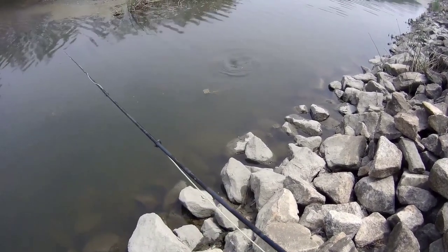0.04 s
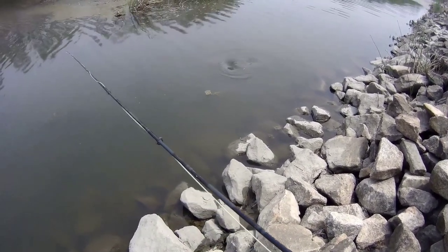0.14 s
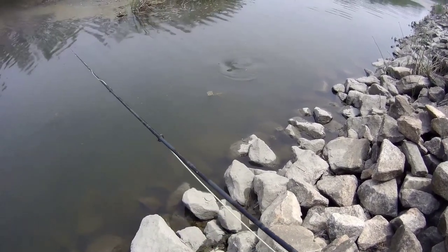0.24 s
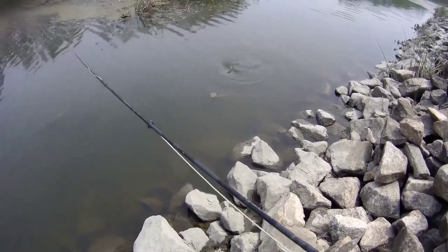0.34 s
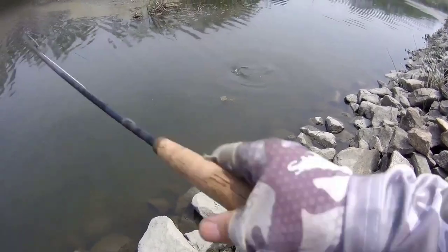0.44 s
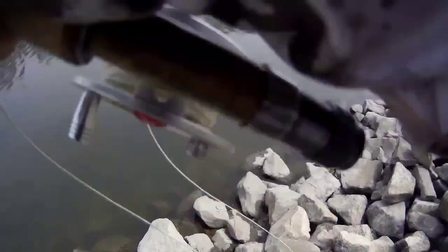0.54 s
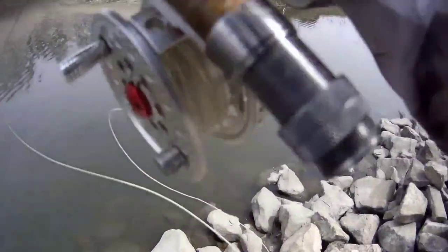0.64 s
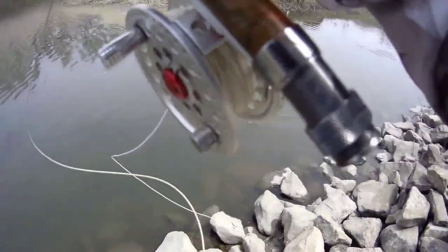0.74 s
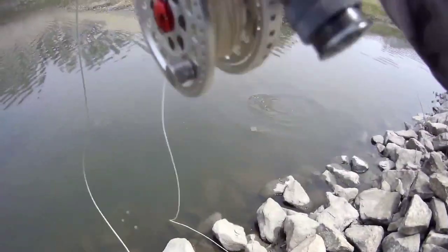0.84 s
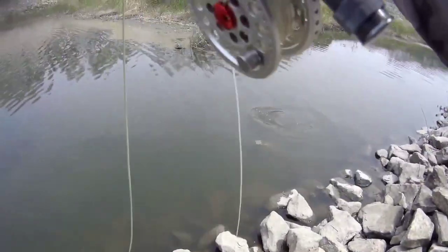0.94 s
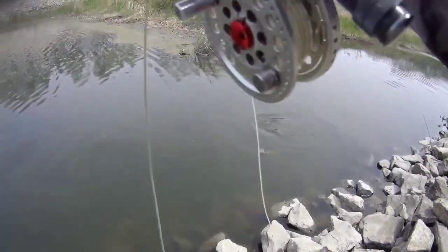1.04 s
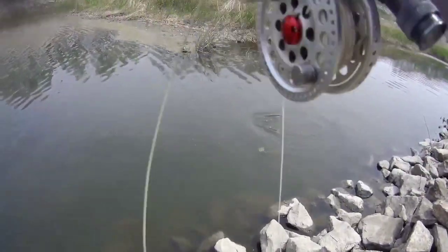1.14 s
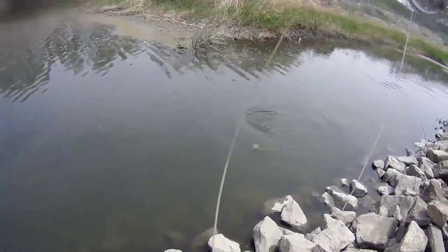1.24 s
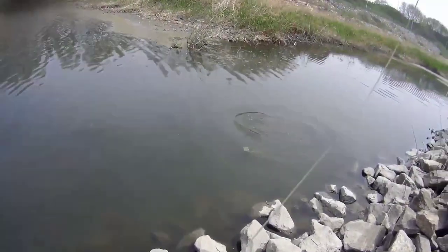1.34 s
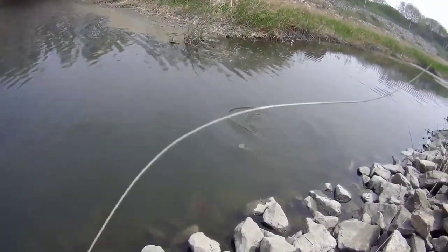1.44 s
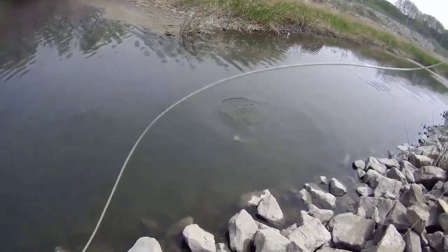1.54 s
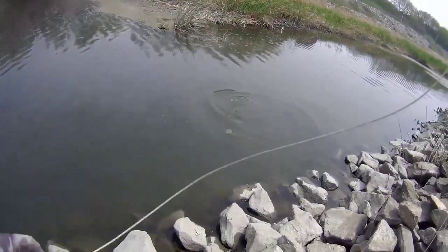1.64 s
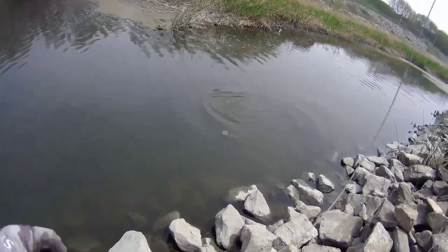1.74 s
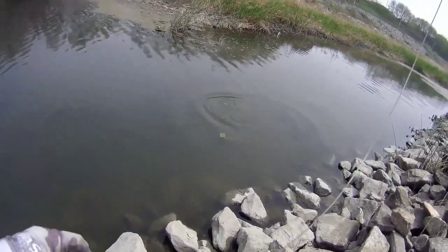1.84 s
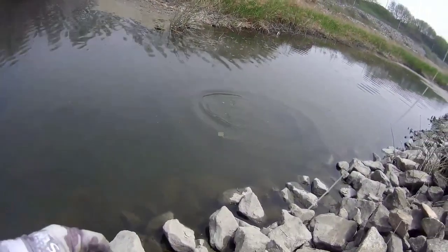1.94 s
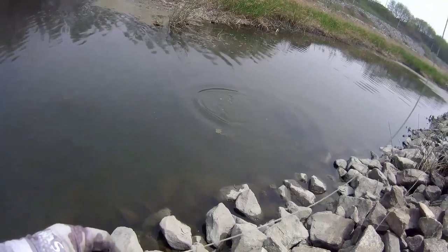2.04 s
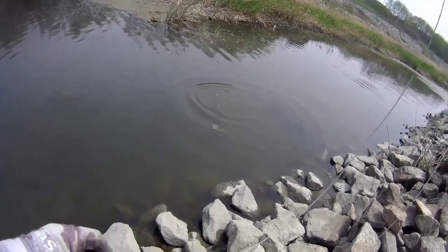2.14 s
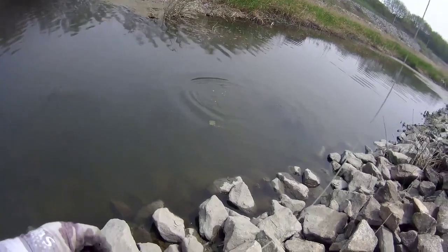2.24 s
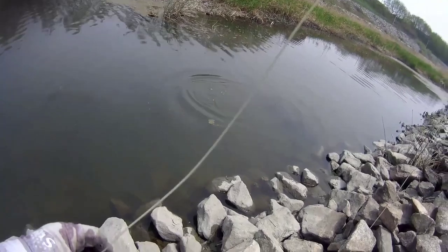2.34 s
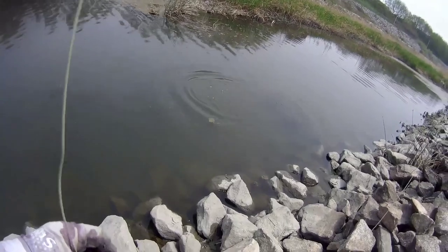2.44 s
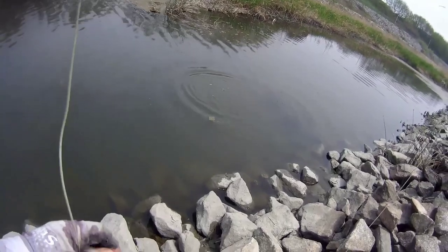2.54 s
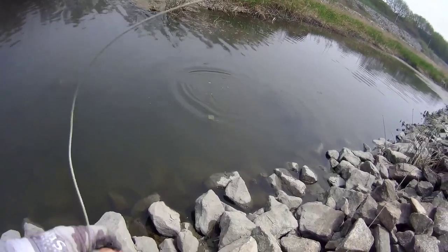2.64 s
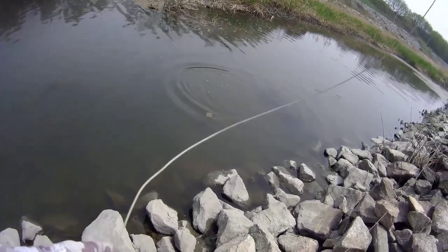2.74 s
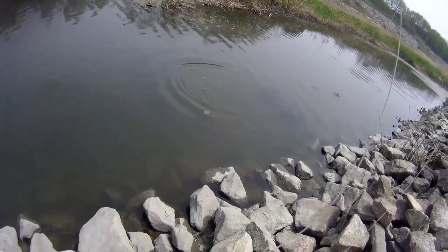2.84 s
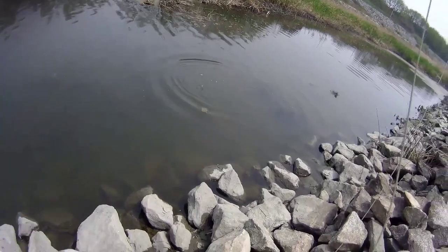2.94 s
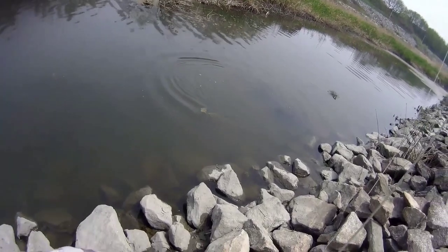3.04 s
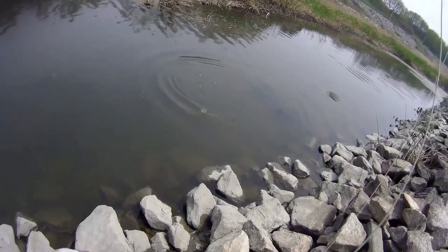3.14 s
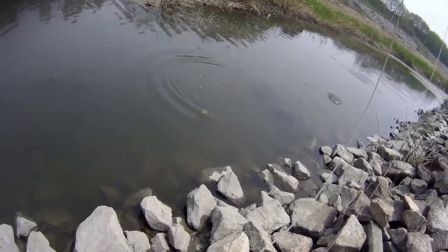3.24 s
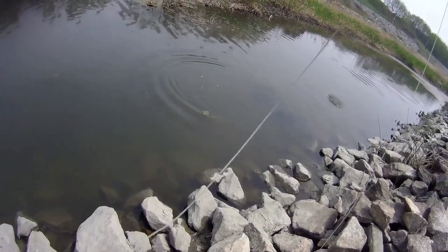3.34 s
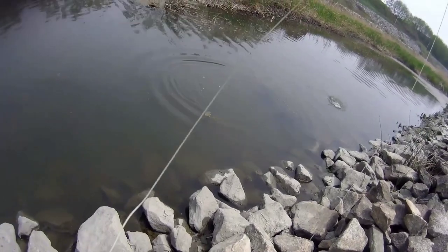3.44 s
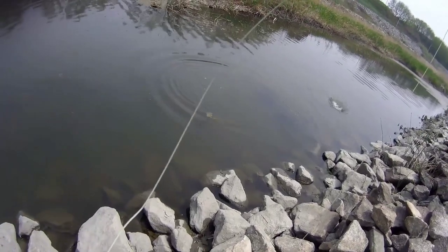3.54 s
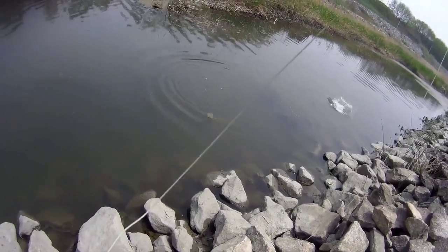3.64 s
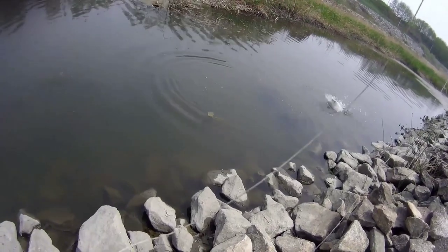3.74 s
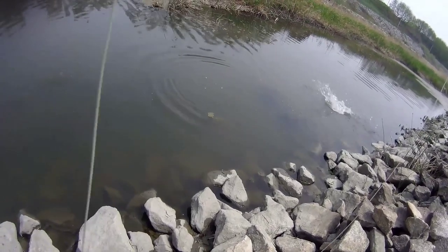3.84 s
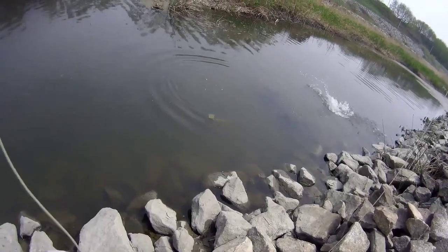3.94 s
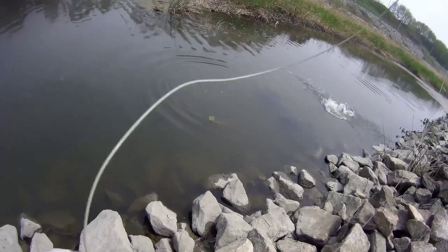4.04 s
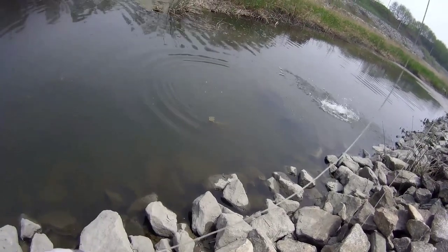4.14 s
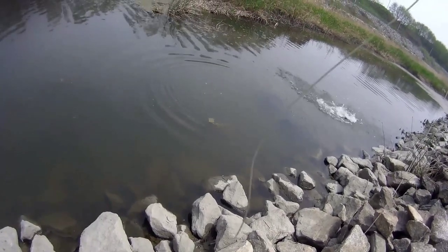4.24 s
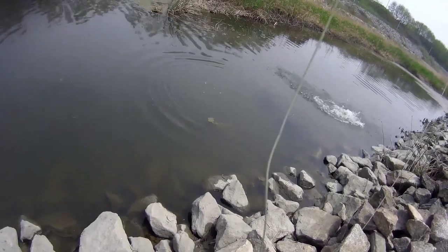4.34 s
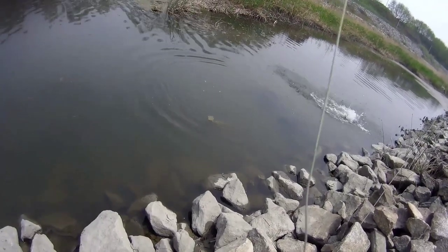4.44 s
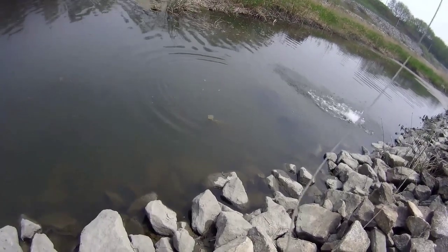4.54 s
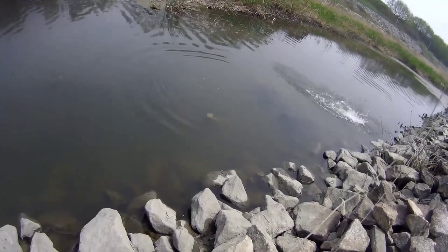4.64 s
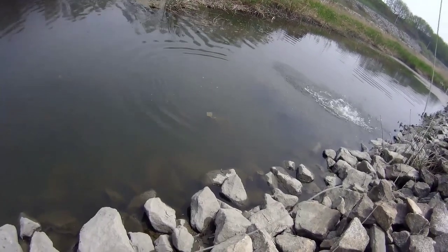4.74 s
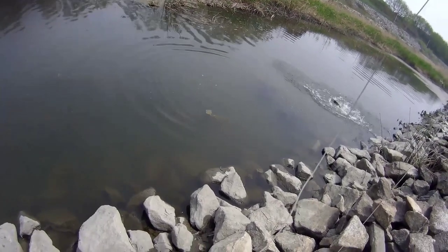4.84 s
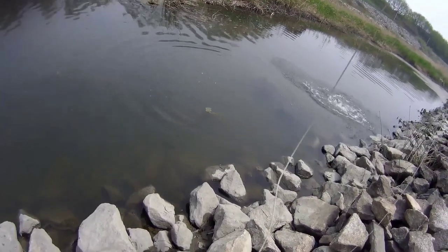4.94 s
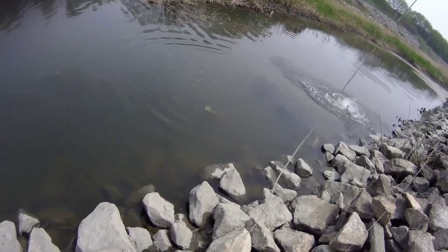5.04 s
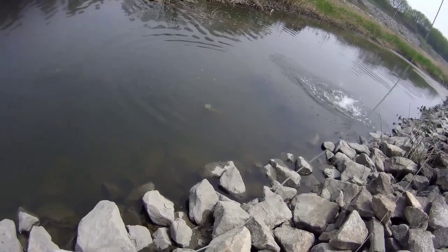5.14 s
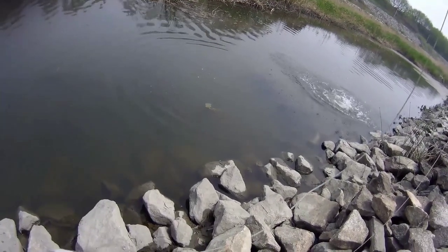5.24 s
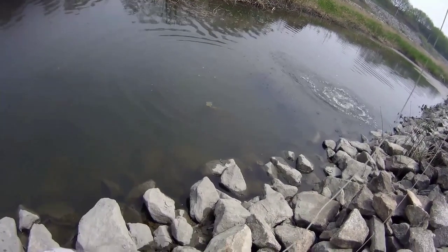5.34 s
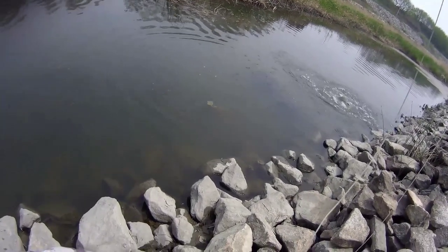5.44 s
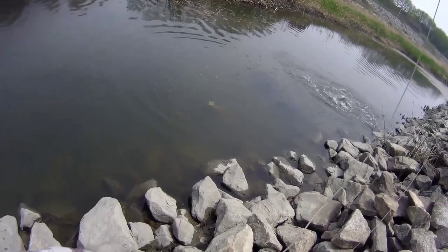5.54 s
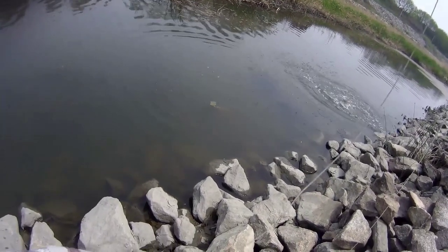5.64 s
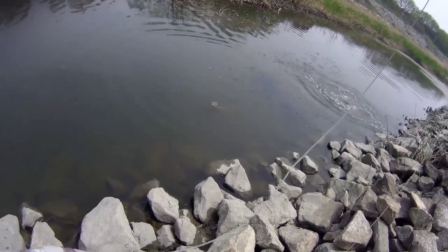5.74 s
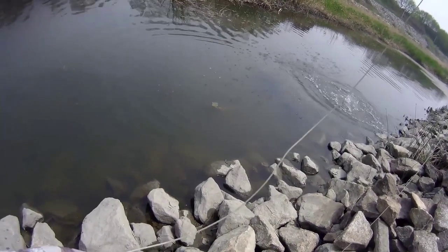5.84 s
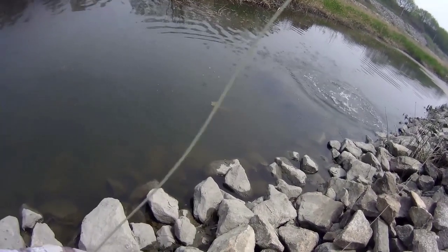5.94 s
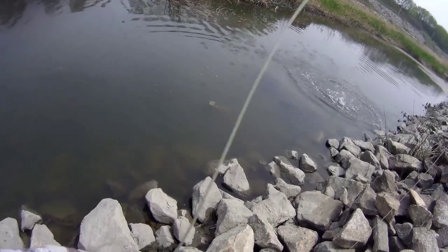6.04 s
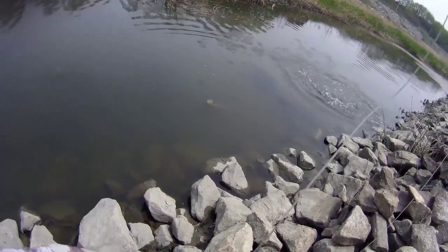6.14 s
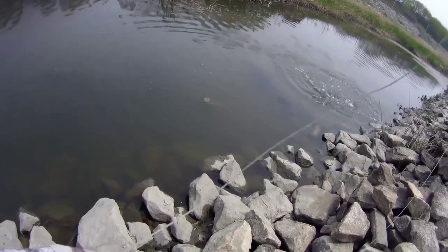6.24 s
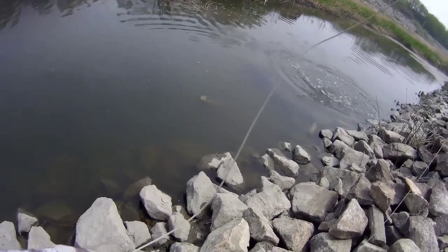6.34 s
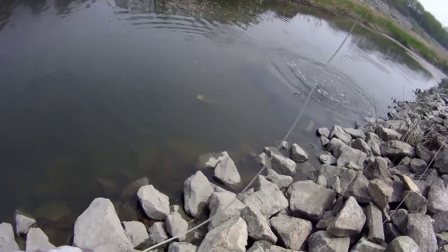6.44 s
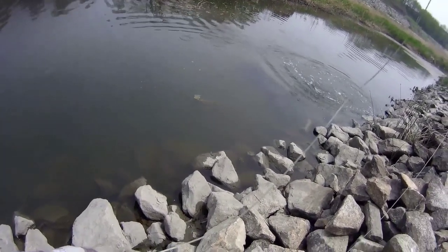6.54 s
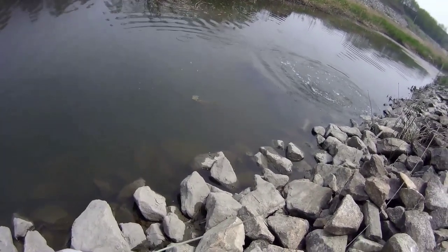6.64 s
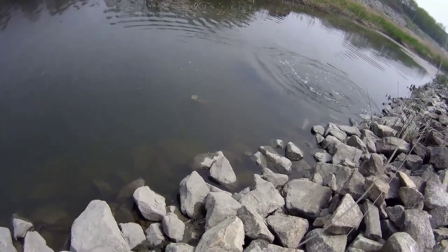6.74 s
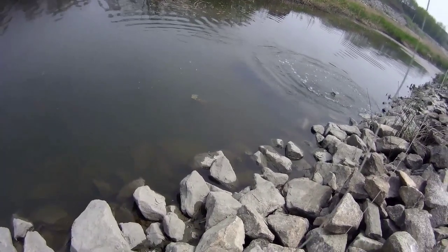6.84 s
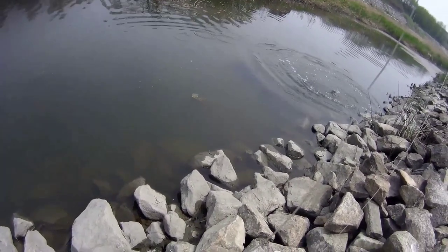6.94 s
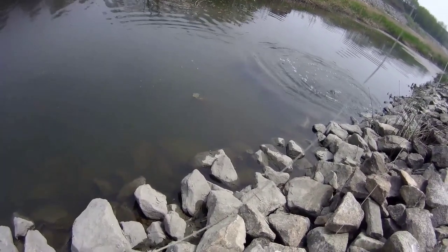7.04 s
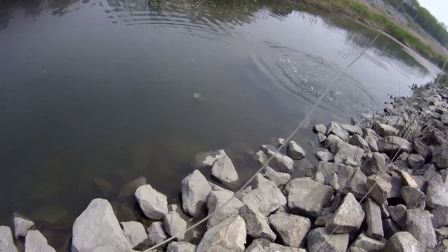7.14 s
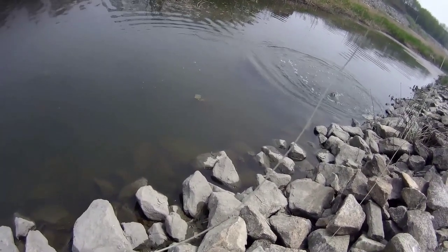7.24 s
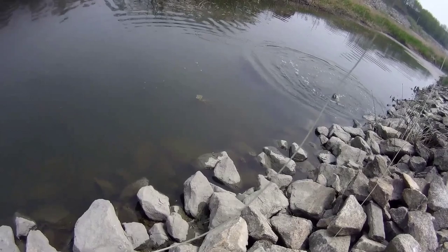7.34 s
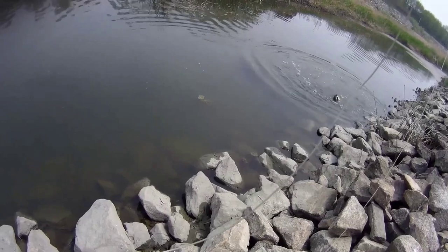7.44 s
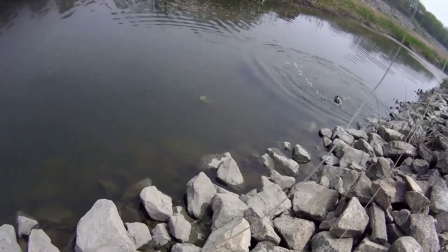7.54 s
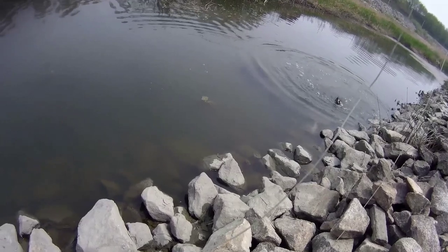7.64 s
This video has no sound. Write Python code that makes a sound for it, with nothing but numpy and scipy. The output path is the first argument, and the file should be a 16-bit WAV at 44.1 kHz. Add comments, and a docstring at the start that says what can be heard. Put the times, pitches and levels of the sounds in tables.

```python
"""An angler on a rocky river bank plays a fish, over slowly growing distant rumble and light wind (shaped noise).
Tackle clicks sharply (cracks and damped modes) and line rasps through the hand (clumped slips of noise).
A small bird calls a run of falling chirps (gliding sines); then the fish thrashes at the surface with
gulping air pockets, bubbles, slaps, a drop's plink and falling spray (ringing bubbles, modes, noise bursts).
The bird calls a second run at the end; a thin echo from the banks follows all but rumble and wind."""
import sys
import numpy as np
from scipy import signal
from scipy.fft import rfft, irfft, next_fast_len
from scipy.io import wavfile
from scipy.ndimage import map_coordinates

SR = 44100
rng = np.random.default_rng(int(sys.argv[2]) if len(sys.argv) > 2 else 0)


def log_audio(samples):
    """Write samples as a 16-bit WAV file to the path given in sys.argv[1]."""
    # one column per channel
    frames = np.atleast_2d(samples).T
    # limit to full scale, then quantise
    limited = np.clip(frames, -1, 1)
    pcm = np.round(limited * 32767).astype(np.int16)
    wavfile.write(sys.argv[1], SR, pcm)


N = 339693

# the fish's tail beats, ending in small swirls: t/s, churned water level/dB, spray level/dB, hold/s
TAIL_BEATS = [(3.478, -43, -51.5, 0.14), (3.529, -49, -43, 0.036), (3.673, -43, -45, 0.087),
              (3.78, -37.5, -42.5, 0.15), (3.997, -35.5, -40.5, 0.036), (4.157, -40.5, -46.5, .035),
              (4.302, -38.5, -43.5, 0.048), (4.427, -36.5, -43, 0.074), (4.616, -43, -44, 0.035),
              (4.808, -45.5, -48, 0.16), (4.973, -42.5, -49.5, 0.0049), (5.095, -45.5, -50, 0.048),
              (5.225, -65, -49.5, 0.066), (5.95, -66, -56.5, .02), (6.018, -51.5, -50, 0.066),
              (6.152, -51, -54, 0.013), (6.244, -59, -58.5, 0.073)]
BEAT_RISE_S, WASH_RELEASE_S = 0.019, 4.7  # linear attack of a beat; t60 of the sloshing after it


def amp(db):
    """Decibels to gain."""
    return 10 ** (np.asarray(db) / 20)


def unit(x):
    """Scale to rms 1."""
    return x / np.sqrt(np.mean(x ** 2) + 1e-20)


def along(points, hz):
    """Read (f/Hz, value) points on a log frequency axis."""
    f, v = np.transpose(points)
    return np.interp(np.log(hz + 1), np.log(f), v)


def wobble(rate):
    """A smooth random curve of about unit spread, rate knots a second."""
    knots = rng.standard_normal(int(N * rate / SR) + 4)
    return map_coordinates(knots, [np.arange(N) * rate / SR])


def fade(t, t60):
    """Exponential decay, 60 dB down at t60."""
    return np.exp(-np.log(1000) * t / t60)


def colour(x, points):
    """Shape x by a (f/Hz, level/dB) spectrum, at rms 1."""
    m = next_fast_len(len(x) + 4096)
    gain = amp(along(points, np.fft.rfftfreq(m, 1 / SR)))
    return unit(irfft(rfft(x, m) * gain, m)[:len(x)])


def add(track, s, sound):
    """Mix a sound into the track at time s."""
    part = track[round(s * SR):][:len(sound)]
    part += sound[:len(part)]


def gesture(s, rise, hold, release):
    """Gain over the whole scene: a linear rise from time s, a hold, then a decay with t60 = release."""
    t = np.arange(N) / SR - s
    return np.clip(t / rise, 0, 1) * fade(np.maximum(t - rise - hold, 0), release)


def together(gains):
    """Overlapping noises add in power."""
    return np.sqrt(sum(g ** 2 for g in gains))


def air():
    """Distant rumble and a light breeze at the microphone, with a few lumpy puffs: shaped noise."""
    # spectrum of the distant rumble: f/Hz, level/dB
    rumble_spectrum = [(25, -20), (60, -23.5), (120, -12.5), (220, -2.5), (400, -4.5), (850, 2),
                       (1100, -2.5), (1500, -8.5), (2100, -13), (3000, -20.5), (4300, -30), (6500, -37),
                       (10000, -42), (15500, -38.5)]
    # spectrum of wind on the microphone: f/Hz, level/dB
    wind_spectrum = [(20, -26), (50, -9.5), (115, 1), (200, -2.5), (330, -6), (600, -16), (1500, -52)]
    # puffs of wind on the microphone: t/s, level/dB, hold/s
    puff_list = [(1.646, -61, .04), (1.904, -55, .04), (5.115, -57, 0.072), (5.27, -55, 0.055),
                 (5.846, -51, 0.028), (6.031, -43.5, 0.025), (6.16, -50.5, 0.013), (6.62, -58, 0.22),
                 (7.326, -60, .05)]
    rumble_db, growth_db_per_s = -52.5, 0.31
    puff_rise_s, puff_release_s, breeze_db = 0.015, 0.56, -64  # the release is a t60

    far_db = rumble_db + growth_db_per_s * np.arange(N) / SR
    far = amp(far_db + 0.7 * wobble(11.0)) * colour(rng.standard_normal(N), rumble_spectrum)

    puffs = together(amp(db) * gesture(s, puff_rise_s, hold, puff_release_s) for s, db, hold in puff_list)
    lumpy_puffs = puffs * amp(4.3 * wobble(30))
    breeze = amp(breeze_db + 2.5 * wobble(20))
    wind = together([lumpy_puffs, breeze]) * colour(rng.standard_normal(N), wind_spectrum)
    return far + wind


def tackle_and_plink():
    """Tackle clicks and one water drop's plink: each a brief crack and a few heavily damped modes."""
    # tackle clicks, and a water drop's plink at 4.8165 s:
    # t/s, relative level/dB, ring f/Hz, ring t60/s, relative crack level/dB
    clicks = [(.3795, -35.5, 3140, 0.0074, 5), (.4262, -33, 3800, 0.0052, -19),
              (0.5258, -9, 2260, 0.0045, -16), (0.5276, -32, 3100, 0.0069, 7),
              (.568, -11.5, 2136, 0.013, -9.5), (0.7692, -49, 4500, 0.003, 16), (1.3, -40, 2330, 0.01, -18),
              (2.2463, -31.5, 3480, 0.0095, -14), (2.2504, -39, 3500, 0.0094, -4),
              (2.295, -23, 2820, 0.011, -8.5), (3.121, -45.5, 3100, 0.011, -19),
              (3.172, -49.5, 3020, .01, -18), (3.3645, -30.5, 2590, .02, -5),
              (4.8165, -24.5, 2170, 0.0098, -6)]
    # modes of the ring: pitch ratio, level/dB, t60 ratio
    modes = [(.35, -51, 1), (1, 4.5, 0.89), (1.22, -6.5, 0.88), (1.52, -13, 0.83), (1.92, -40, 0.28)]
    # spectrum of the crack: f/Hz, level/dB
    crack_spectrum = [(200, -29), (700, 20), (2500, 7), (4500, 9.5), (6500, 2.5), (7200, -12), (8200, 1.5),
                      (9200, -68), (14000, -42)]
    attack_s, trim_db = 0.00039, 3.5  # the trim lifts the ring and leaves the crack as it was

    out, t = np.zeros(N), np.arange(SR // 20) / SR
    for s, db, hz, t60, crack_db in clicks:
        ring = sum(amp(level) * np.sin(2 * np.pi * hz * ratio * t) * fade(t, t60 * life)
                   for ratio, level, life in modes)
        noise = colour(rng.standard_normal(len(t)), crack_spectrum)
        crack = amp(crack_db - trim_db) * noise * fade(t, t60 * 1.2)
        add(out, s, amp(db + trim_db) * (ring + crack) * (1 - np.exp(-t / attack_s)))
    return out


def line_and_rattle():
    """Line and sleeve rasp, and clicks rattle out, in dense clumped slips; the stronger, the more it sings."""
    # pulls of line through the hand, and the rattling tails of the clicks at 2.25 and 2.295 s
    # (rows 2.228 and 2.287): t/s, level/dB, rise/s, hold/s
    rasp_list = [(0.417, -43.5, 0.015, 0.037), (0.435, -37.5, 0.041, 0.025), (0.581, -43.5, .008, 0.019),
                 (0.659, -45.5, 0.017, .006), (0.77, -58, .03, .01), (0.839, -54, 0.041, 0.01),
                 (1.178, -56.5, 0.019, .01), (1.48, -58, .015, .01), (1.76, -59, .025, .01),
                 (2.228, -46, 0.015, .004), (2.287, -41.5, .008, .004), (3.288, -60.5, 0.044, 0.12),
                 (5.833, -53, 0.033, 0.029)]
    # spectrum of the rasp: f/Hz, level/dB
    rasp_spectrum = [(120, -41), (250, -10), (450, -4), (850, -5.5), (1250, -14), (2100, -4), (3000, -0.5),
                     (3600, -3.5), (4600, -4), (5100, -10.5), (6200, -19), (7200, -31.5), (15000, -54)]
    # spectrum of the singing, as of a taut line: f/Hz, level/dB
    sing_spectrum = [(2400, -43), (3400, 0), (4100, 2), (4800, -1), (6200, -43)]
    release_s, handling_db = .13, -71  # t60 of a row; the sleeve never quite rests
    sing_db = -1.5  # against the rasp, at its strongest

    struck = rng.random(N) < 5000 / SR  # about 5000 slips a second
    slips = struck * rng.standard_normal(N) * amp(1.05 * wobble(260))
    strength = together(amp(db) * gesture(s, rise, hold, release_s) for s, db, rise, hold in rasp_list)
    handling = amp(handling_db + 5.8 * wobble(5))
    rasp = together([strength, handling]) * colour(slips, rasp_spectrum)

    sing = colour(rng.standard_normal(N) * amp(2.2 * wobble(300)), sing_spectrum)
    return rasp + amp(sing_db) * strength ** 2 / strength.max() * sing


def bird():
    """Falling whistles with faint overtones; the level flutters as the sweep crosses its reflections."""
    # chirps: t/s, length/s, level/dB, mid pitch f/Hz
    chirps = [(1.096, 0.12, -45, 4210), (1.37, 0.12, -46.5, 4025), (1.583, 0.12, -46, 4060),
              (1.801, 0.12, -48, 3980), (2.021, .13, -48, 3950), (2.24, 0.14, -48.5, 4060),
              (2.487, 0.11, -50.5, 4050), (7, 0.11, -47, 4170), (7.229, 0.14, -47, 4020),
              (7.462, 0.12, -45, 3994), (7.681, .125, -43.5, 4020)]
    # course of one chirp: share of its length, pitch ratio, level/dB
    slur = [(0, 1.7, -18), (.05, 1.39, -4), (.11, 1.2, 0), (.22, 1.1, 1), (.42, 1.01, -1), (.7, .958, -1),
            (.82, .92, -2), (.92, .84, -6), (1, .72, -22)]
    # reflections off the rocks: delay t/s, level/dB
    reflections = [(.0035, -14.5), (.014, -26), (0.026, -43)]
    # the first chirp after a pause fades in more slowly (time constants)
    swell_s, opening_swell_s, run_gap_s = 0.0081, 0.061, 1

    out = np.zeros(N)
    share, ratio, shape_db = np.transpose(slur)
    pauses = np.diff([s for s, *_ in chirps], prepend=-np.inf)
    for (s, length, db, hz), pause in zip(chirps, pauses):
        swell = opening_swell_s if pause > run_gap_s else swell_s
        t = np.arange(int(length * SR)) / SR
        waver = 1 + 0.0043 * wobble(400)[:len(t)] + 0.0036 * wobble(39)[:len(t)]
        pitch = hz * waver * np.interp(t / length, share, ratio)
        phase = 2 * np.pi * np.cumsum(pitch) / SR
        tone = np.sin(phase) + amp(-44) * np.sin(2 * phase) + amp(-33.5) * np.sin(3 * phase)
        gain = np.sqrt(2) * amp(db + np.interp(t / length, share, shape_db))
        add(out, s, gain * (1 - np.exp(-t / swell)) * tone)

    mirrored = np.zeros(N)
    for delay, db in reflections:
        add(mirrored, delay, amp(db) * out)
    return out + mirrored


def stirring(beats, release, wash_db):
    """Gain of the stirred water: each (s, dB, hold) beat surges, dies quickly and leaves a weak, long wash."""
    surge = together(amp(db) * gesture(s, BEAT_RISE_S, hold, release) for s, db, hold in beats)
    keep = fade(1 / SR, WASH_RELEASE_S) ** 2  # power kept from one sample to the next
    wash = np.sqrt(signal.lfilter([1 - keep], [1, -keep], surge ** 2))
    return together([surge, amp(wash_db) * wash])


def bubble(t, hz, t60, rise):
    """A ringing air pocket: soft start, pitch climbing as it nears the surface."""
    phase = 2 * np.pi * hz * t * (1 + rise * np.minimum(t / t60, 1) / 2)
    return np.sin(phase) * fade(t, t60) * (1 - np.exp(-2 * hz * t))


def bubbles(rate, low_hz, high_hz, cycles, spread_db, rise, size):
    """A steady swarm (rate a second, size samples each) of bubbles of random pitch and strength, at rms 1."""
    draw = rng.random((int(rate * N / SR), 4))
    hz = low_hz + (high_hz - low_hz) * draw[:, :1]
    life = cycles * (.5 + draw[:, 1:2]) / hz
    strength = amp(-spread_db * np.log(.03 + draw[:, 2:3])) * hz  # a few stand out
    waves = strength * bubble(np.arange(size) / SR, hz, life, rise)
    at = (draw[:, 3:] * N).astype(int) + np.arange(size)
    return unit(np.bincount(at.ravel(), waves.ravel(), N)[:N])


def churn():
    """Stirred water: large bubbles over a dull wash of noise, its level heaving irregularly."""
    # spectrum of churned water: f/Hz, level/dB
    churn_spectrum = [(50, -46), (130, -15.5), (250, -4), (400, -0.5), (620, -4.5), (830, -9.5), (1150, -7),
                      (1500, -21.5), (2200, -47), (4000, -70)]
    level = stirring([(s, db, hold) for s, db, _, hold in TAIL_BEATS], release=0.68, wash_db=-19)
    swarm = bubbles(rate=700, low_hz=164.0, high_hz=1541, cycles=20.5, spread_db=0.5, rise=0.2, size=2600)
    water = colour(swarm + amp(-12) * rng.standard_normal(N), churn_spectrum)
    return level * amp(wobble(35)) * water


def spray():
    """Flung drops patter back in clumps, each leaving a tiny bubble; the finest fly higher and land later."""
    # spectrum of the patter: f/Hz, level/dB
    patter_spectrum = [(800, -19), (1550, -6.5), (2150, 1), (3000, -4), (4200, -12.5), (5200, -15.5),
                       (6400, -23.5), (8000, -28), (10000, -30.5), (12500, -39), (15500, -50)]
    # single plips stand out as the spray thins, since they follow its level with a power below 1
    plips_db, plips_follow = -51.5, 0.81
    # the finest drops land this much later, in tiny flurries
    flight_s, mist_db, mist_flicker_db = .55, -28, 6.5

    level = stirring([(s, db, hold) for s, _, db, hold in TAIL_BEATS], release=0.75, wash_db=-16.5)
    drips = bubbles(rate=110, low_hz=1500, high_hz=4600, cycles=28, spread_db=5, rise=.2, size=900)
    crackle = bubbles(rate=1500, low_hz=1480, high_hz=13700, cycles=5.4, spread_db=2.0, rise=0.12, size=200)
    patter = colour(crackle + rng.standard_normal(N) / 2, patter_spectrum)
    clumps = amp(1.67 * wobble(70))
    plips = amp(plips_db) * (level / level.max()) ** plips_follow * drips

    landing = np.zeros(N)
    add(landing, flight_s, level)
    flurries = rng.standard_normal(N) * amp(mist_flicker_db * wobble(220))
    mist = colour(flurries, [(2500, -33), (5000, -10.0), (9500, -7), (15000, -24)])
    return level * clumps * patter + plips + amp(mist_db) * landing * mist


def strokes():
    """The fish's blows: gulps of ringing air cavities and bright noisy slaps on the surface."""
    # air pockets, from deep gulps to small drips: t/s, relative level/dB, starting f/Hz
    gulps = [(3.4965, -33, 653), (3.516, -26, 425), (3.596, -27.5, 453), (3.692, -30, 292),
             (3.796, -27, 375), (3.811, -29, 260), (3.8515, -19, 1050), (3.94, -21.5, 386),
             (4.007, -26.5, 290), (4.0325, -22.5, 980), (4.042, -21.5, 524), (4.061, -20.5, 640),
             (4.205, -27, 420), (4.308, -25.5, 1100), (4.339, -20, 556), (4.3423, -16.5, 1080),
             (4.423, -25.5, 427), (4.464, -23.5, 403), (4.542, -36.5, 224), (4.827, -24.5, 947),
             (4.878, -25.5, 462), (4.893, -24.5, 480), (4.984, -36, 313), (5.098, -31.5, 490),
             (5.122, -33, 516), (5.145, -31.5, 596), (5.333, -31, 4150), (5.7545, -26, 2140),
             (5.783, -33.5, 613), (6.312, -34, 2130), (6.384, -35, 3270)]
    # fin slaps and sheets of water landing: t/s, relative level/dB, centre f/Hz, t60/s
    slaps = [(3.539, -39, 2610, 0.093), (3.764, -20, 4430, 0.024), (3.7856, -27.5, 3400, 0.034),
             (3.8515, -30, 2000, 0.01), (4.0596, -22, 2000, 0.0083), (4.341, -36.5, 1997, 0.066),
             (4.517, -34, 2500, 0.067), (4.8256, -27.5, 2600, 0.018), (4.8443, -25, 2820, 0.021),
             (5.002, -38.5, 2900, 0.12), (6.045, -44, 2700, 0.033)]
    gulp_cycles = 20  # a pocket rings for this many cycles: big ones last longer
    rise_per_khz = 0.14  # small pockets climb further in pitch

    out, t = np.zeros(N), np.arange(SR // 8) / SR
    for s, db, hz in gulps:
        add(out, s, amp(db + 0.5) * bubble(t, hz, gulp_cycles / hz, rise=rise_per_khz * hz / 1000))
    for s, db, hz, t60 in slaps:
        spectrum = [(hz / 8, -22), (hz / 2, -7), (hz, 0), (5000, -6), (6500, -17), (9500, -27), (15000, -55)]
        burst = colour(rng.standard_normal(len(t)), spectrum)
        add(out, s, amp(db + 3.5) * burst * fade(t, t60) * (1 - np.exp(-t / 0.002)))
    return out


def banks(x):
    """A thin diffuse echo from the stones and the far bank: noise decaying at its own pace in each band."""
    # echo of the banks: f/Hz, t60/s
    echo_decay = [(200, 0.14), (3500, 0.16), (10000, 0.075)]
    hz, t, z = signal.stft(rng.standard_normal(SR // 2), SR, nperseg=256)
    decaying = z * fade(t, along(echo_decay, hz)[:, None])
    tail = signal.istft(decaying, SR, nperseg=256)[1]
    late = np.pad(x, (SR // 100, 0))  # the echo starts 10 ms late
    return signal.fftconvolve(late, tail / np.linalg.norm(tail))[:N]


def scene():
    """Clicks, plink and rasp echo least, the splashing more, the bird most; rumble and wind stay dry."""
    near = tackle_and_plink() + line_and_rattle()
    splash = churn() + spray() + strokes()
    song = bird()
    echo = banks(amp(-31) * near + amp(-17) * splash + amp(-10.5) * song)
    return (near + splash + song + echo + air())[None]


def record(dry):
    """The microphone rolls off gently, and nothing passes above the band limit."""
    # microphone response: f/Hz, level/dB
    response = [(25, -1.5), (70, 0), (8000, -1), (11000, -6.5), (15500, -16.5)]
    top_hz = 15720
    m = next_fast_len(N + SR // 2)
    hz = np.fft.rfftfreq(m, 1 / SR)
    gain = amp(along(response, hz)) * (hz < top_hz)
    return irfft(rfft(dry, m) * gain, m)[..., :N]


dry = scene()
out = record(dry)
log_audio(out)
```